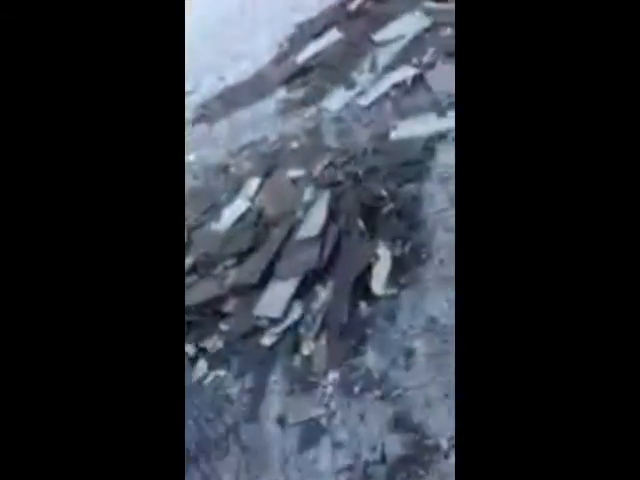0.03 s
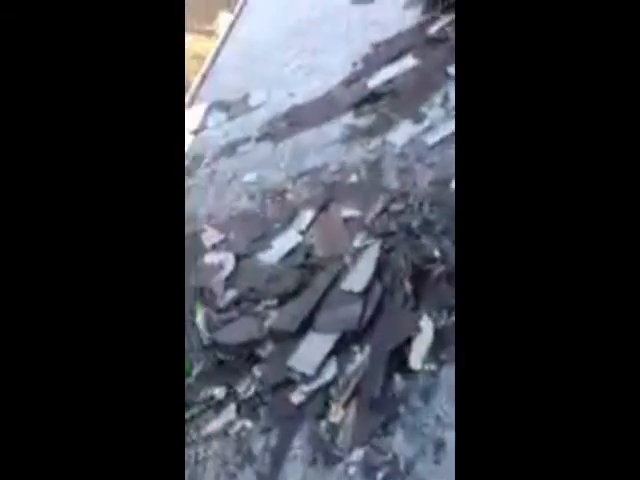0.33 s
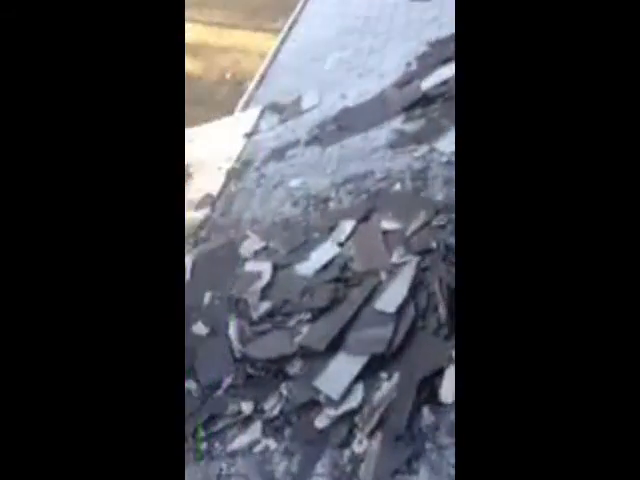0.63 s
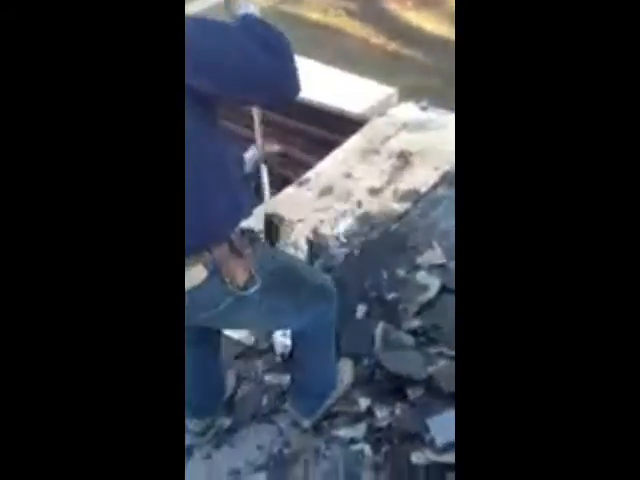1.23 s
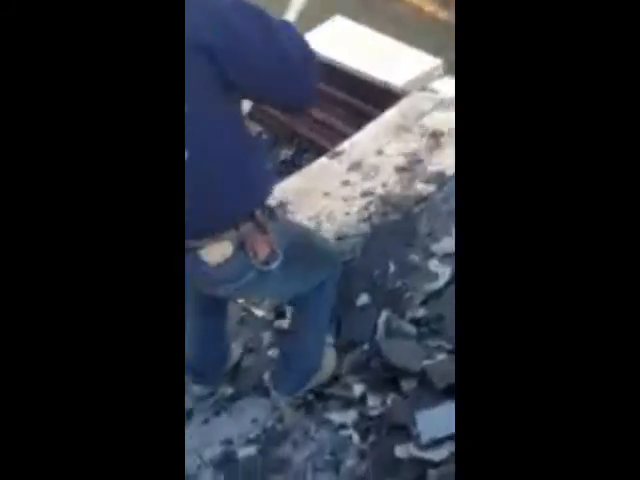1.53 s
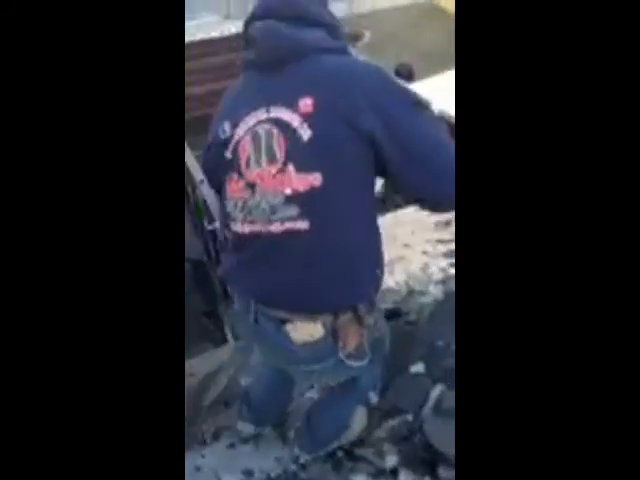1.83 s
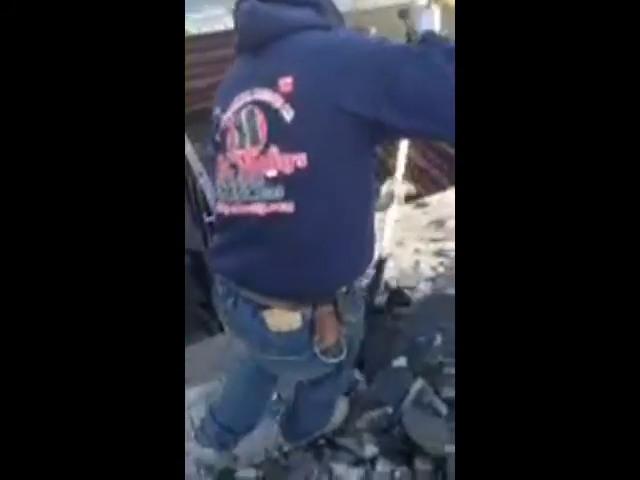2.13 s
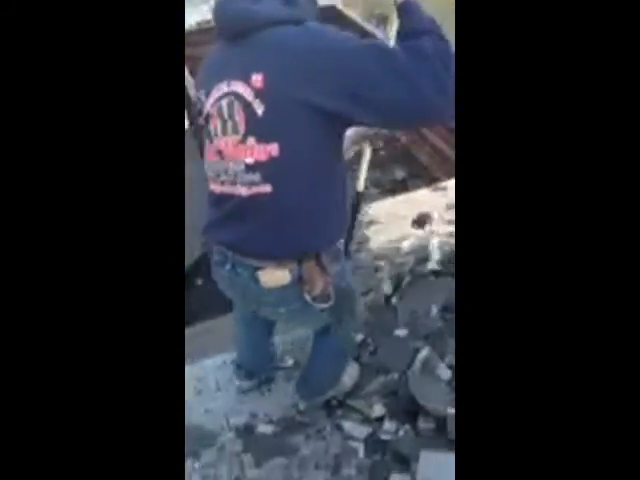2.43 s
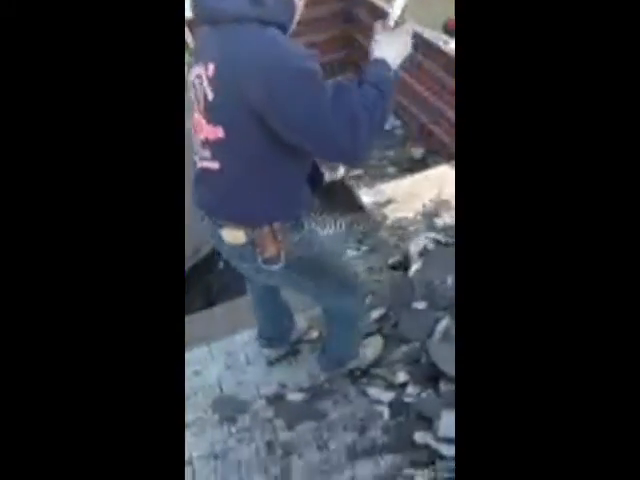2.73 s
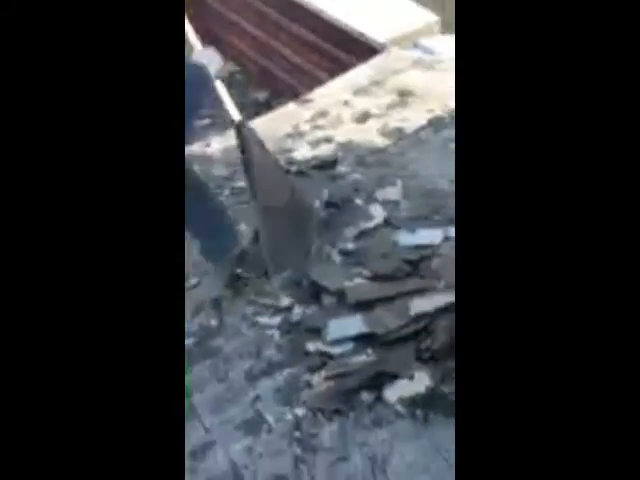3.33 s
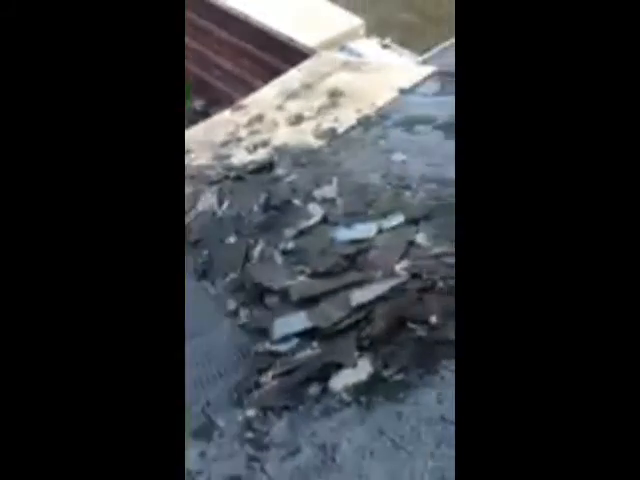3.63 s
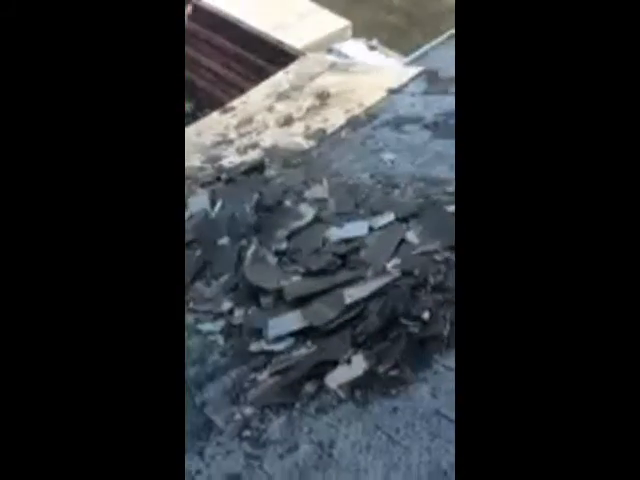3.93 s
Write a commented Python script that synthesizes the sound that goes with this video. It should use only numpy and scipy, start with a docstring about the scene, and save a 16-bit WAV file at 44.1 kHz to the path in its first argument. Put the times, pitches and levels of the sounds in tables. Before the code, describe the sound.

Shovel scraping crunches through loose roof shingles, with brittle pieces clacking and the blade briefly ringing. The scrapes thin out as boots and shovel knock the wooden deck, then pick up again, in faint outdoor air on a small mono microphone.

```python
"""On a roof, outdoors: a steel tear-off shovel scrapes up broken asphalt shingles.
Grit catches under the blade in dense crackling strokes, pieces clack, loose debris slides.
Boots and shovel thump the hollow wooden deck; blows and catches ring the steel.
Short reflections and a faint wash of air surround the work. Small mono microphone."""
import sys
import numpy as np
from scipy import signal
from scipy.fft import rfft, irfft, next_fast_len
from scipy.io import wavfile

SR = 44100
rng = np.random.default_rng(int(sys.argv[2]) if len(sys.argv) > 2 else 0)


def log_audio(samples):
    """Write samples as a 16-bit WAV file to the path given in sys.argv[1]."""
    # one column per channel
    frames = np.atleast_2d(samples).T
    # limit to full scale, then quantise
    limited = np.clip(frames, -1, 1)
    pcm = np.round(limited * 32767).astype(np.int16)
    wavfile.write(sys.argv[1], SR, pcm)


N = 4 * SR

# Spectra. Each row: frequency in Hz, gain in dB.
AIR_SPECTRUM = [(30, -14), (100, 0), (220, 7.5), (500, 12), (1000, 5), (3000, -9), (6500, -5.5),
                (10000, -14.5)]
RUMBLE_SPECTRUM = [(20, -9), (45, -2), (100, 0), (160, -1), (300, -20.5), (1000, -48.5)]
ECHO_SPECTRUM = [(100, -10), (800, 0.5), (2500, 3.5), (10000, 0.5)]
SHINGLE_SPECTRUM = [(30, -41), (200, -14), (450, -8.5), (1100, -0.5), (2200, 4), (4200, 3), (6500, 0),
                    (10000, -9)]
GRIT_SPECTRUM = [(30, -3), (150, -15.5), (550, -4), (900, 0), (1300, 2), (2200, 1), (4200, 4.5),
                 (6500, -0.5), (10000, -13)]
STRUCK_DECK_SPECTRUM = [(30, -20.5), (100, -42.5), (165, 2.5), (350, -1.5), (600, -8), (900, -18),
                        (1500, -29), (5000, -44)]
SCRAPED_DECK_SPECTRUM = [(30, -27.5), (80, -5.5), (170, 7), (350, 6.5), (600, 3), (900, -5.5),
                         (1500, -37.5), (5000, -48)]
MIC_SPECTRUM = [(20, -4), (6600, 2), (7100, 1.5), (7600, -6), (8600, -4), (9800, 0.5), (11000, -27)]

# Sliding debris. Each row: time in seconds, level in dB.
DEBRIS_LEVELS = [(0, -37.5), (.3, -35), (.37, -40.5), (.9, -34.5), (1.3, -34.5), (1.72, -36.5), (2.1, -38),
                 (2.4, -38.5), (2.7, -40), (2.78, -44), (2.9, -42), (3.05, -41), (3.32, -42.5), (3.5, -41),
                 (3.7, -42.5), (4, -37)]
# Boots and shovel on the deck. Each row: start in seconds, level in dB, mid-sag pitch in Hz,
# decay in seconds, relative rattle in dB.
DECK_THUMPS = [(.144, -13.5, 232, 0.0052, -15), (.245, -20, 288, 0.0083, -2),
               (.349, -26.5, 273, 0.0062, 5.5), (.383, -28.5, 214, 0.029, -7),
               (.408, -27, 196, 0.0033, 11.5), (.521, -23.5, 202.4, 0.012, 3),
               (.845, -28, 260, 0.013, -0.5), (.96, -34, 230, 0.0088, 7), (1.191, -27, 242, 0.0081, -1.5),
               (1.242, -22, 224, 0.009, -2), (1.333, -18.5, 321, 0.0075, -6),
               (1.6, -16.5, 184, 0.0077, -22), (1.621, -32.5, 210, 0.018, 7), (1.688, -29, 269, 0.012, -16),
               (1.993, -25.5, 340, 0.0074, 13), (2.006, -19, 196, 0.017, -3),
               (2.022, -22.5, 256, 0.014, -1), (2.042, -35, 294, .007, 15), (2.064, -30, 248, 0.0081, -4),
               (2.2, -14.5, 300, 0.0062, 1), (2.206, -20, 189, 0.013, -6), (2.241, -26, 240, 0.035, -5),
               (2.499, -22.5, 268, 0.0061, -17), (2.538, -24, 284, 0.0059, -17),
               (2.713, -44, 290, 0.019, 12), (2.945, -13.5, 196, 0.0031, 5),
               (2.952, -16.5, 358, 0.01, -8.5), (2.9555, -22, 482, 0.015, -3), (2.96, -14, 158, 0.0064, -3),
               (3.166, -31.5, 266, 0.019, 5.5), (3.228, -20.5, 217, 0.0052, -23),
               (3.406, -34, 263, 0.036, -9), (3.4845, -11, 242, 0.0058, -16), (3.582, -30, 264, 0.022, -6),
               (3.626, -19.5, 253, 0.0095, -15), (3.792, -21, 210, 0.0067, -8.5)]
# Blade ringing after a catch. Each row: start in seconds, level in dB, pitch in Hz, decay in seconds.
BLADE_PINGS = [(.072, -26, 1484, 0.04), (.115, -29, 1390, .04), (.117, -29.5, 795, .06),
               (.195, -21, 1705, 0.025), (.302, -29, 3960, 0.017), (1.568, -34.5, 1820, .07)]
# Modes of the tool. Each row: frequency in Hz, relative level in dB, T60 in seconds.
SHOVEL_MODES = [(473, 2.5, 0.066), (620, -15, 0.028), (890, 3.5, 0.036), (1117, 2.5, 0.031),
                (1375, -8, 0.073), (1840, -9, 0.032), (2400, -27, .04), (3580, -26, 0.027)]
# Hard blows. Each row: start in seconds, level in dB, mode tilt in dB per octave.
SHOVEL_BLOWS = [(1.995, -35, -9.5), (2.011, -36, -19), (2.024, -33.5, -15), (2.2, -30, 2), (2.948, -28, -6),
                (2.955, -26.5, -5.5), (2.963, -30, 4.5), (3.487, -24, 5)]
# Pieces and blade clacking. Each row: start in seconds, level in dB, pitch in Hz, decay in seconds,
# crack tilt in dB per octave.
SHINGLE_CLACKS = [(.019, -25, 2600, 0.026, -2), (.0725, -17, 1510, .007, -2),
                  (.083, -19.5, 3970, 0.0029, 3), (.114, -21.5, 1550, 0.0077, -7),
                  (.121, -15.5, 1940, 0.0063, -1), (.144, -20, 3400, 0.0069, 23),
                  (.2175, -18, 5200, 0.0065, -3.5), (.232, -24, 3400, 0.011, -1.5),
                  (.3015, -23.5, 2800, 0.0099, -2), (.382, -29.5, 5700, 0.0029, -2),
                  (.409, -27, 1470, 0.00774, -8.5), (.458, -26, 4800, .002, -4),
                  (.4835, -20.5, 5340, .007, -2), (.592, -9, 5600, 0.0054, 6), (.676, -15, 2040, 0.004, 0),
                  (.770, -13, 4300, 0.0059, 4.5), (.797, -17.5, 4550, 0.0046, 4),
                  (.827, -14, 1900, .011, -1.5), (.9625, -19.5, 1310, 0.0033, 0),
                  (1.052, -27, 2800, 0.0037, -6), (1.094, -23.5, 5300, 0.0038, 0),
                  (1.196, -17, 5500, 0.0027, -3), (1.243, -20, 3870, 0.003, -8.5),
                  (1.263, -27.5, 2750, 0.007, -1), (1.2968, -9.5, 1990, .0028, -1.5),
                  (1.302, -17, 2400, 0.0046, -5), (1.423, -23.5, 2000, 0.0044, -3),
                  (1.53, -25, 3840, 0.0042, 2), (1.568, -19.5, 1800, 0.0046, -0.5),
                  (2.199, -27, 1090, 0.0068, -7), (2.342, -25, 3580, 0.0035, -3),
                  (2.431, -29, 2780, 0.009, -4.5), (2.471, -27.5, 3300, .005, -2),
                  (2.5, -26.5, 2400, 0.0061, 11), (2.54, -22, 1500, 0.0024, -6),
                  (2.638, -19, 6880, 0.0049, -1), (2.946, -28, 900, .006, -6), (2.958, -25, 1040, .009, -9),
                  (3.166, -26.5, 3700, 0.0045, -2.5), (3.238, -29, 2800, 0.005, -11),
                  (3.276, -23.5, 1500, 0.0051, -24), (3.368, -31, 4500, 0.0036, -2),
                  (3.486, -16, 1300, 0.0054, -8.5), (3.6005, -22, 2050, 0.0023, -6),
                  (3.7155, -23.5, 3000, 0.0027, -7.5), (3.881, -19, 4890, 0.0034, 0),
                  (3.9075, -14, 4000, .004, -31), (3.985, -8, 5500, 0.009, 37),
                  (3.9925, -9, 4300, 0.0037, -2)]
# Pushes of the blade. Each row: start in seconds, length in seconds, level in dB, attack in seconds,
# level change over the stroke in dB, grit tilt in dB per octave, blade ring in Hz,
# relative ring in dB, relative deck rumble in dB.
SHOVEL_STROKES = [(.05, 0.1, -27, 0.011, -2, -1, 1670, 0, -15),
                  (.16, 0.078, -27.5, 0.018, -0.5, 4.5, 1800, 9, -26),
                  (.24, 0.1, -46, .01, 2, -1, 2700, -9, -9), (.41, 0.13, -34, .005, -6, -5, 1900, -1, -6),
                  (.4815, 0.086, -21.5, 0.005, 3, 1, 3100, -18, -8.5),
                  (.562, 0.067, -16.5, 0.0094, -2.5, 1, 2900, -12, -8),
                  (.62, 0.099, -21, .008, 3, 1, 2250, -6, -15.5),
                  (.73, 0.087, -21.5, .005, -4.5, -0.3, 4300, -25, -16.5),
                  (.84, .14, -27.5, .005, -6, -2.2, 2330, -15, -15.5),
                  (1.0, 0.35, -33.5, 0.055, -7, -2, 2655, -27.5, -6.5),
                  (1.39, 0.068, -35.5, .04, 0, -2.5, 2700, -21, -23.5),
                  (1.5, .15, -37.5, 0.028, 9, 1, 1900, -1.5, -34.5),
                  (1.775, 0.098, -25.5, 0.027, -4.5, -0.3, 2030, -7, -7.5),
                  (1.87, .12, -30, .005, -1.5, -2, 2030, -8, -0.5),
                  (1.99, 0.067, -45, .005, 4.5, 1, 3500, -1, -23.5),
                  (2.28, .07, -37, 0.0068, -3, -0.5, 3530, -21, -4),
                  (2.46, 0.068, -33.5, 0.0079, -2.5, -2, 1210, -10, -3.5),
                  (2.608, 0.08, -33, 0.0058, -5.5, -2, 3600, -20, -6),
                  (2.825, 0.044, -37.5, .01, -8.5, 1, 2910, -22, -8),
                  (3.165, 0.094, -42, 0.0041, -6, -6.5, 3170, -10.5, 2.5),
                  (3.36, 0.061, -40, 0.016, 3.5, -1.5, 1280, -6, -8),
                  (3.462, 0.062, -41.5, 0.0051, 1, -5.5, 1420, -2, -6),
                  (3.59, 0.044, -41.5, 0.0173, 4.5, -7, 1920, 1, -6),
                  (3.88, .022, -30, .003, 5.5, -2, 5000, -22.5, -22),
                  (3.907, 0.18, -19, .002, 5.5, -0.8, 5280, -12, -15)]


def amp(db):
    """Decibels to gain."""
    return 10 ** (np.asarray(db) / 20)


def unit(x):
    """Scales to rms 1."""
    return x / np.sqrt(np.mean(x ** 2) + 1e-20)


def add(mix, start_s, sound):
    """Mixes a sound in at start_s."""
    part = mix[max(round(start_s * SR), 0):][:len(sound)]
    part += sound[:len(part)]


def colour(x, spectrum, tilt_db_oct=0):
    """Filters by a spectrum, tilted above about 500 Hz."""
    size = next_fast_len(len(x) + 1024)
    hz = np.fft.rfftfreq(size, 1 / SR) + 1
    knot_hz, knot_db = np.transpose(spectrum)
    gain_db = np.interp(np.log(hz), np.log(knot_hz), knot_db) + tilt_db_oct * np.log2(1 + hz / 500)
    return irfft(rfft(x, size) * amp(gain_db), size)[:len(x)]


def ring(x, hz, width_hz):
    """One resonance."""
    return signal.lfilter(*signal.iirpeak(hz, hz / width_hz, SR), x)


def burst(x, envelope):
    """Shapes noise by an envelope, at that envelope's rms."""
    return unit(x * envelope) * np.sqrt(np.mean(envelope ** 2))


def grains(size, per_s, spread_db):
    """Random clicks, mostly small, a few large."""
    heights = amp(spread_db * np.minimum(rng.exponential(1, size), 4))
    return heights * rng.choice([-1, 1], size) * (rng.random(size) < per_s / SR)


def air():
    """Faint outdoor wash over a distant rumble."""
    wash, rumble = rng.standard_normal((2, N))
    wash = amp(-53.5) * unit(colour(wash, AIR_SPECTRUM))
    return wash + amp(-56) * unit(colour(rumble, RUMBLE_SPECTRUM))


def echoes(x, t60_s=0.19):
    """Thin, short reflections off the roof and nearby walls."""
    t = np.arange(0, .3, 1 / SR)
    taps = colour(grains(len(t), per_s=2000, spread_db=0), ECHO_SPECTRUM) * amp(-60 * t / t60_s)
    return amp(-16.5) * signal.fftconvolve(x, taps / np.linalg.norm(taps))[:N]


def stick_slip(t, step_s=.004, spread_db=1.16):
    """Uneven gain of an edge that catches and slips."""
    knots_s = np.arange(0, t[-1] + step_s, step_s)
    return amp(spread_db * np.interp(t, knots_s, rng.standard_normal(len(knots_s))))


def granule_snaps(size, decay_s=.0009):
    """Larger granules burst with tiny ticks."""
    t = np.arange(0, .01, 1 / SR)
    onsets = abs(grains(size, per_s=90, spread_db=4))
    envelope = signal.fftconvolve(onsets, np.exp(-t / decay_s))[:size]
    return amp(-11.5) * unit(colour(envelope * rng.standard_normal(size), SHINGLE_SPECTRUM))


def debris():
    """Loose granules and scraps trickle over the boards."""
    t = np.arange(N) / SR
    clicks = grains(N, per_s=3500, spread_db=1.5)
    scraps = unit(colour(clicks, SHINGLE_SPECTRUM, tilt_db_oct=-2.5))
    deck = unit(colour(clicks, STRUCK_DECK_SPECTRUM))
    level_db = np.interp(t, *np.transpose(DEBRIS_LEVELS))
    return amp(level_db) * unit((scraps + deck) * stick_slip(t) + granule_snaps(N))


def deck_thump(level_db, hz, decay_s, rattle_db):
    """A board flexes for a few cycles, sagging in pitch; the deck rattles and booms briefly."""
    rise_s, sag_s, boom_s, low_cut_hz = .0028, .011, .03, 98
    t = np.arange(0, .2, 1 / SR)
    rise = 1 - np.exp(-(t / rise_s) ** 2)
    pitch_hz = hz * (1 + 0.14 * (2 * np.exp(-t / sag_s) - 1))
    board = 2 * np.sin(2 * np.pi * np.cumsum(pitch_hz) / SR) * np.exp(-t / decay_s) * rise
    shake = rise * (amp(rattle_db) * np.exp(-t / decay_s) + amp(-14) * np.exp(-t / boom_s))
    deck = burst(colour(rng.standard_normal(len(t)), STRUCK_DECK_SPECTRUM), shake)
    low_cut = signal.butter(4, low_cut_hz, "high", fs=SR, output="sos")
    return amp(level_db) * signal.sosfilt(low_cut, board + deck)


def blade_ping(level_db, hz, decay_s, rise_s=.003):
    """One lightly damped mode of the free blade."""
    t = np.arange(0, 6 * decay_s, 1 / SR)
    envelope = (1 - np.exp(-t / rise_s)) * np.exp(-t / decay_s)
    return amp(level_db) * np.sin(2 * np.pi * hz * t) * envelope


def shovel_blow(level_db, tilt_db_oct, rise_s=.001):
    """A hard blow rings the damped modes of the shovel."""
    t = np.arange(0, .15, 1 / SR)
    modes = np.zeros(len(t))
    for k, (hz, mode_db, t60_s) in enumerate(SHOVEL_MODES):
        start_db = level_db + mode_db + tilt_db_oct * np.log2(hz / SHOVEL_MODES[0][0])
        modes += (-1) ** k * amp(start_db - 60 * t / t60_s) * np.sin(2 * np.pi * hz * t)
    return modes * (1 - np.exp(-t / rise_s))


def shingle_clack(level_db, hz, decay_s, tilt_db_oct):
    """A brittle crack with one short, broad ring."""
    rise_s, width_hz, crack_gain = .00063, 660, amp(4.5)
    t = np.arange(0, 8 * decay_s, 1 / SR)
    envelope = (1 - np.exp(-t / rise_s)) * np.exp(-t / decay_s)
    rub, fracture = rng.standard_normal((2, len(t)))
    tone = burst(ring(ring(rub, hz, width_hz), hz, width_hz), envelope)
    crack = burst(colour(fracture, SHINGLE_SPECTRUM, tilt_db_oct), envelope)
    return amp(level_db) * (tone + crack_gain * crack) / np.hypot(1, crack_gain)


def blade_resonances(x, decay_s=.0068):
    """Adds the dense, quickly damped modes of the blade and the shingle it touches."""
    t = np.arange(0, .04, 1 / SR)
    response = rng.standard_normal(len(t)) * np.exp(-t / decay_s)
    return x + amp(-10.5) * signal.fftconvolve(x, response / np.linalg.norm(response))[:len(x)]


def shovel_stroke(length_s, level_db, attack_s, change_db, tilt_db_oct, ring_hz, ring_db, deck_db):
    """Grit snaps under the blade, ringing the steel and rumbling the deck."""
    release_s = .015
    t = np.arange(0, length_s + 5 * release_s, 1 / SR)
    clicks = blade_resonances(grains(len(t), per_s=9000, spread_db=3.5))
    grit = unit(colour(clicks, GRIT_SPECTRUM, tilt_db_oct))
    steel = amp(ring_db) * unit(ring(clicks, ring_hz, width_hz=450))
    deck = amp(deck_db) * unit(colour(clicks, SCRAPED_DECK_SPECTRUM))
    push = np.minimum(t / attack_s, 1) * amp(level_db + change_db * np.minimum(t / length_s, 1))
    release = np.exp(-np.maximum(t - length_s, 0) / release_s)
    return push * release * unit(stick_slip(t)) * (unit(grit + steel) + granule_snaps(len(t)) + deck)


def scene():
    """Roof work, its reflections and the outdoor air."""
    roof = debris()
    for events, source in ((SHOVEL_STROKES, shovel_stroke), (SHINGLE_CLACKS, shingle_clack),
                           (DECK_THUMPS, deck_thump), (SHOVEL_BLOWS, shovel_blow),
                           (BLADE_PINGS, blade_ping)):
        for start_s, *settings in events:
            add(roof, start_s, source(*settings))
    return (roof + echoes(roof) + air())[None]


def record(dry):
    """Small mono microphone: dull top octave, steep band limit."""
    cutoff_hz = 10300
    low_pass = signal.firwin(401, cutoff_hz, window=("kaiser", 8), fs=SR)
    return signal.oaconvolve(colour(dry[0], MIC_SPECTRUM), low_pass, "same")[None]


dry = scene()
out = record(dry)
log_audio(out)
```